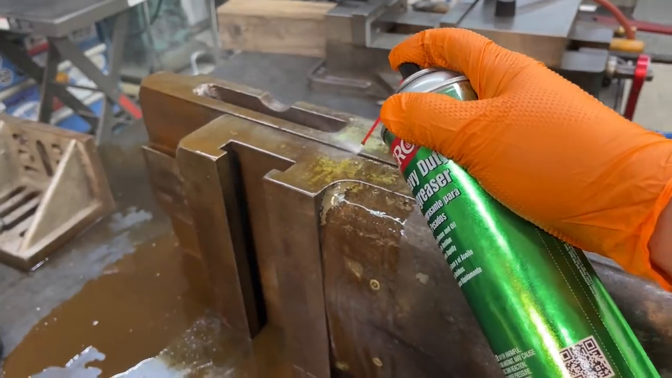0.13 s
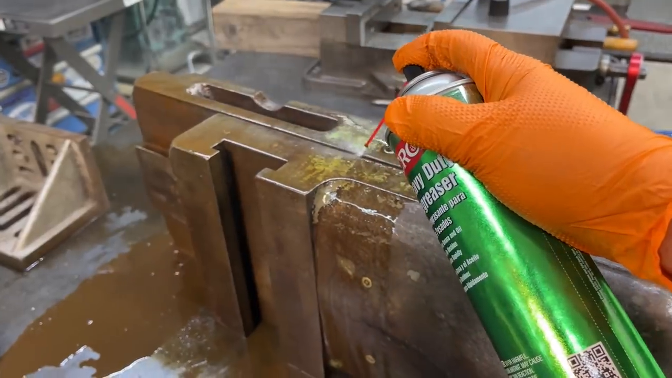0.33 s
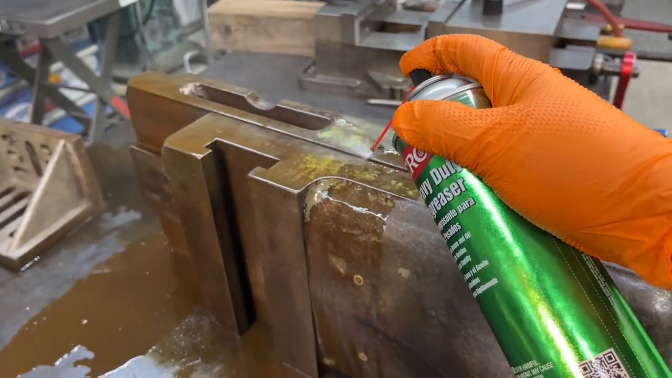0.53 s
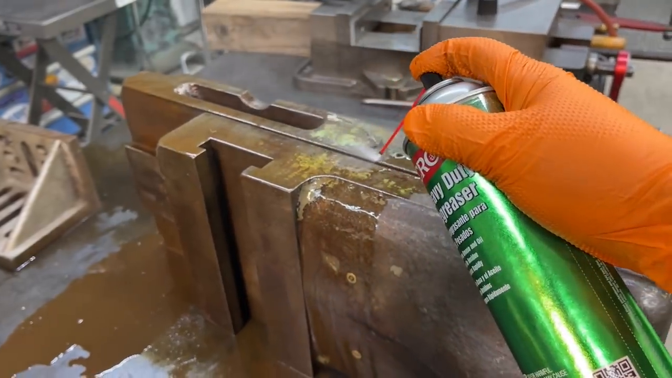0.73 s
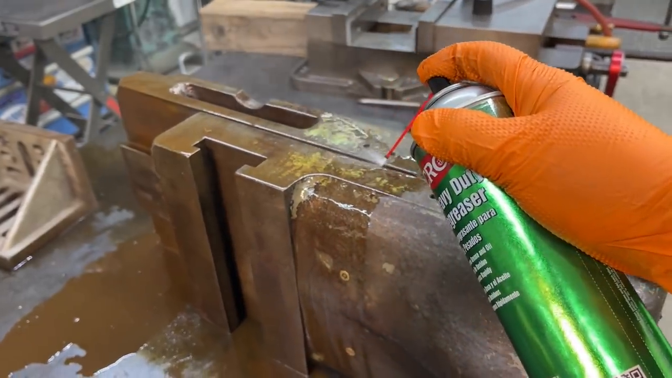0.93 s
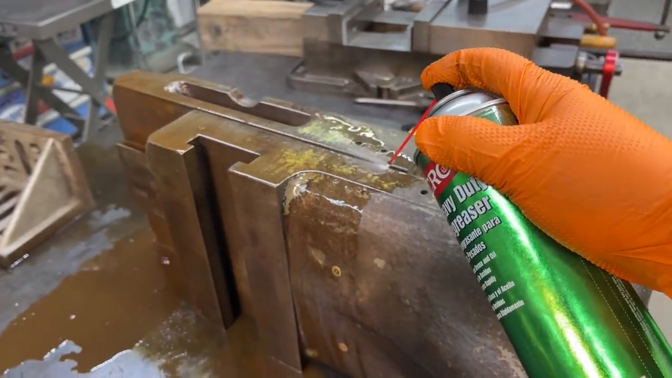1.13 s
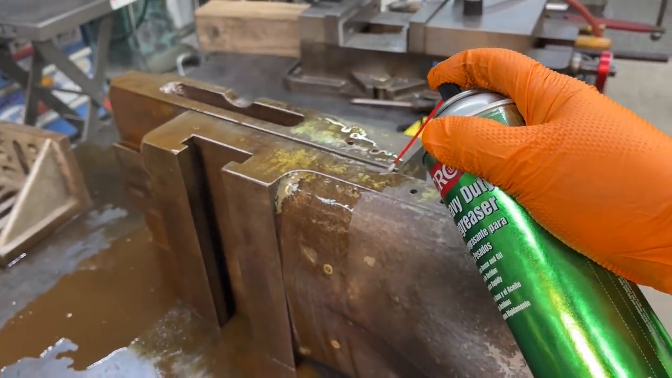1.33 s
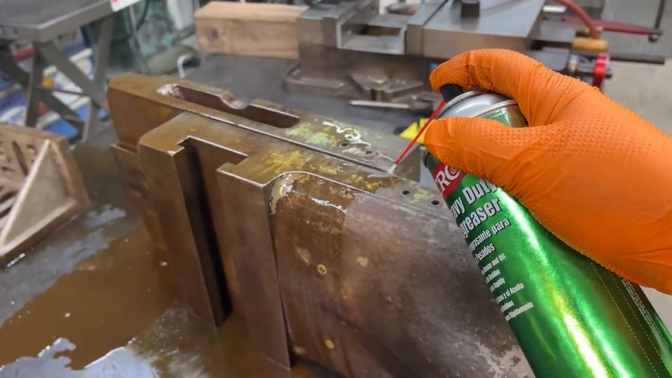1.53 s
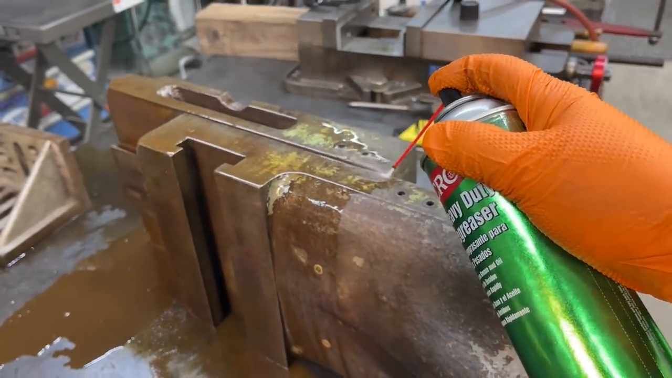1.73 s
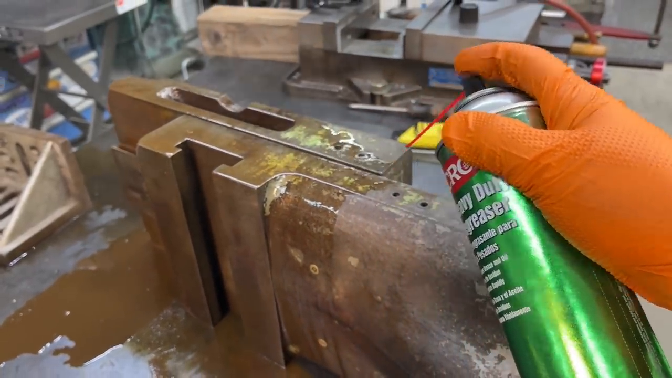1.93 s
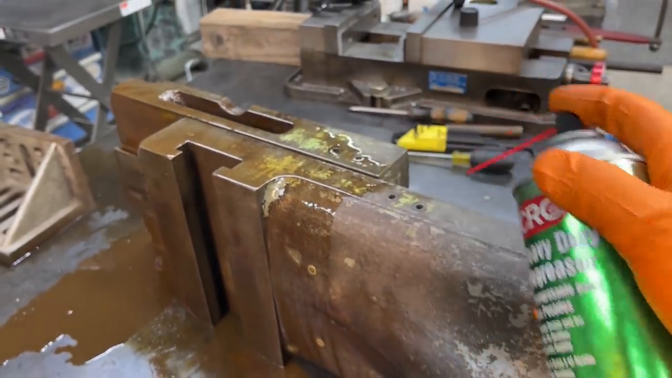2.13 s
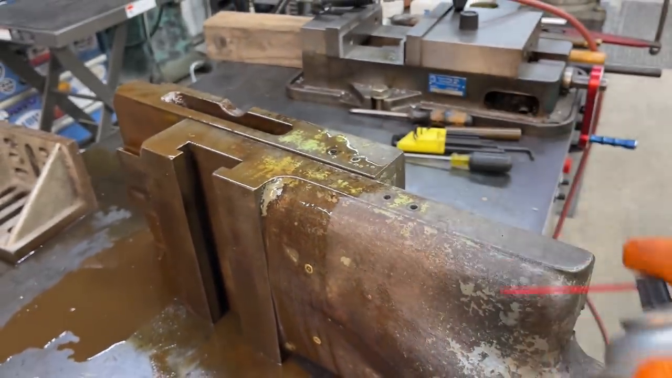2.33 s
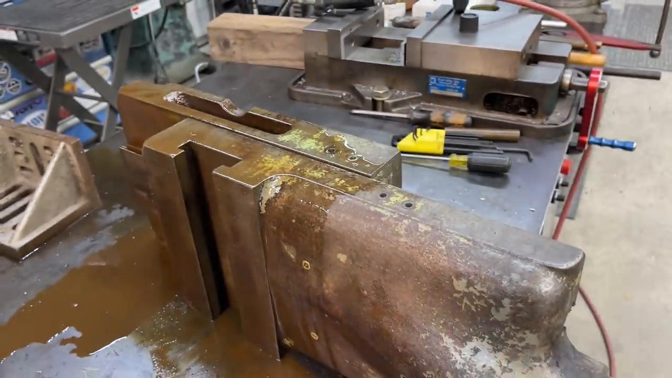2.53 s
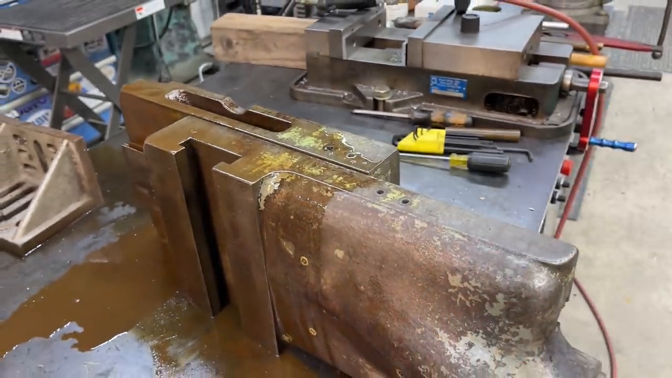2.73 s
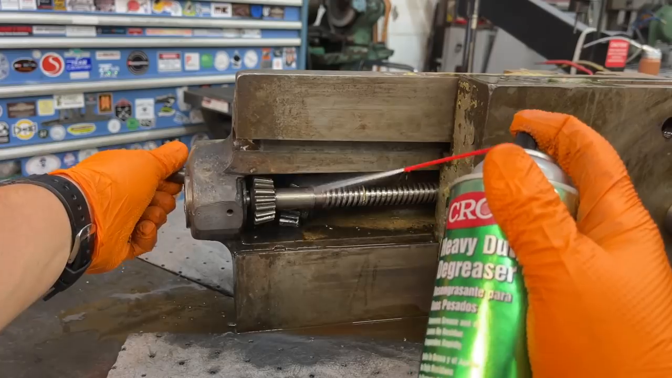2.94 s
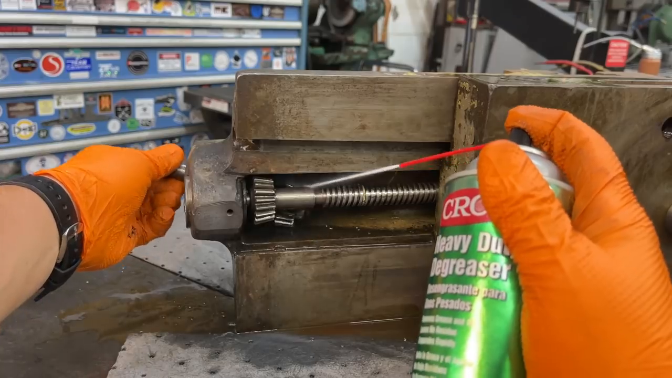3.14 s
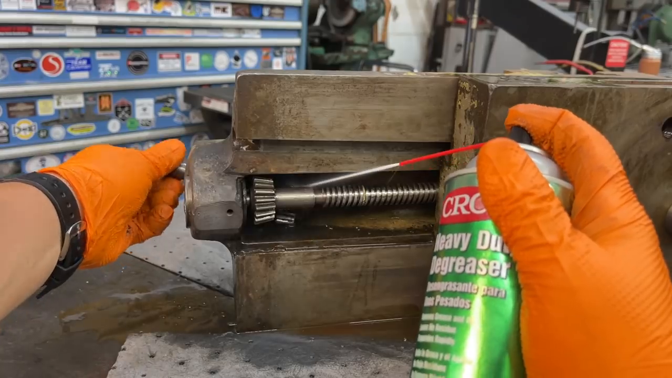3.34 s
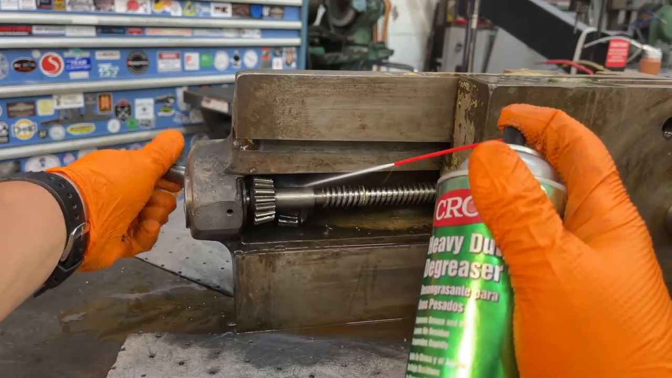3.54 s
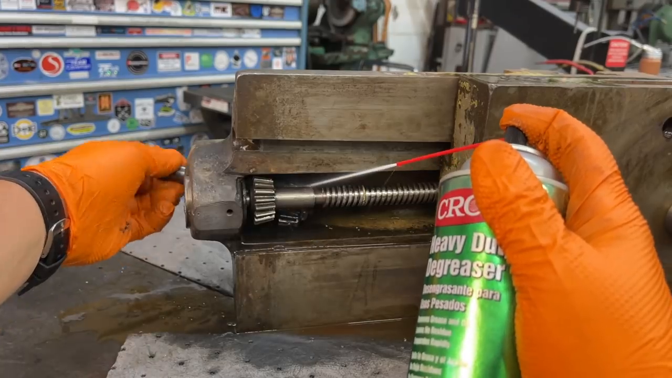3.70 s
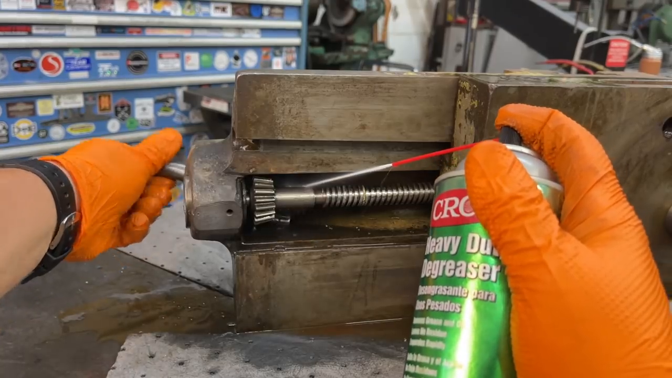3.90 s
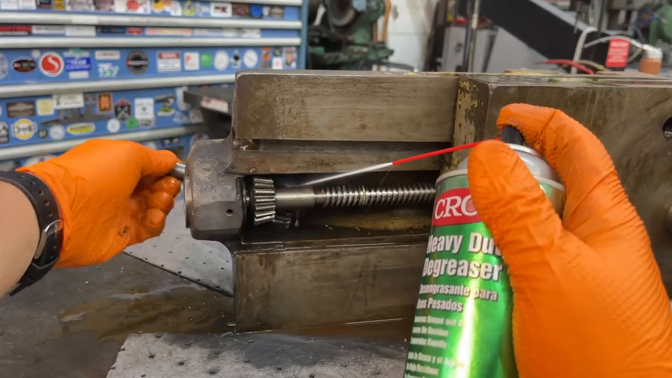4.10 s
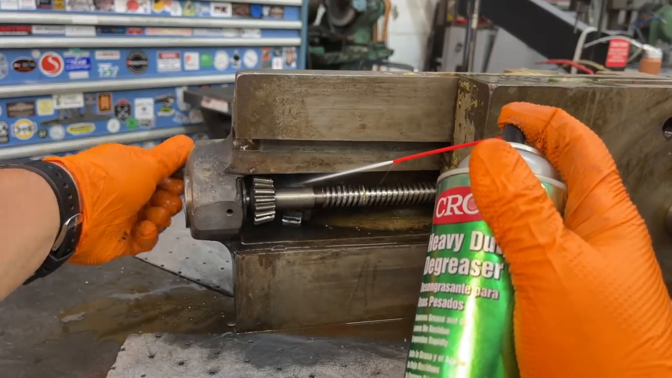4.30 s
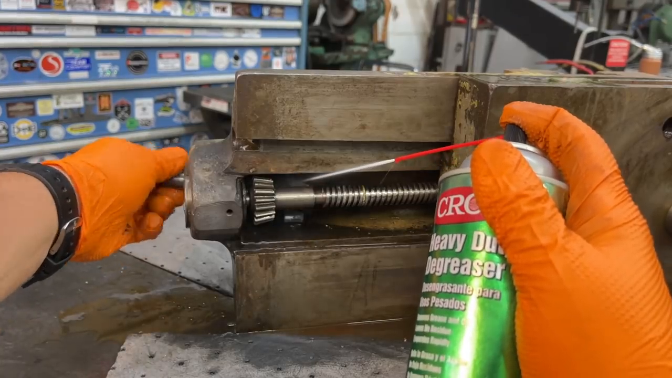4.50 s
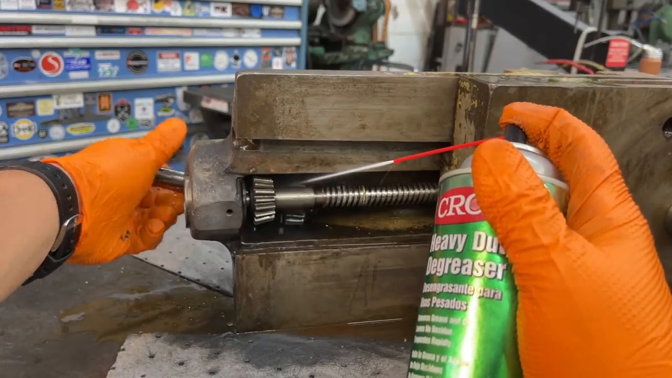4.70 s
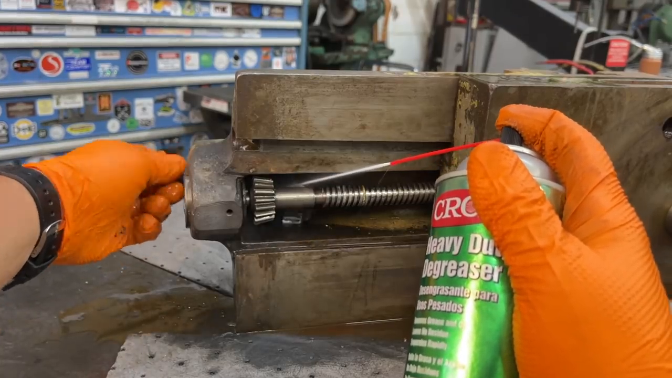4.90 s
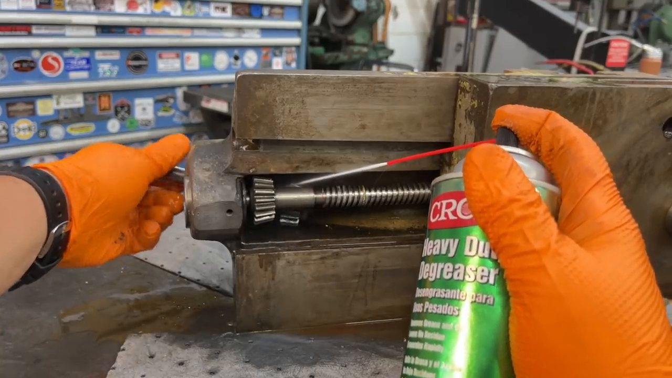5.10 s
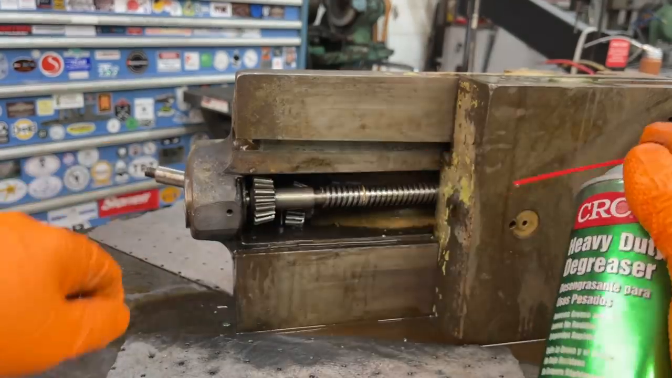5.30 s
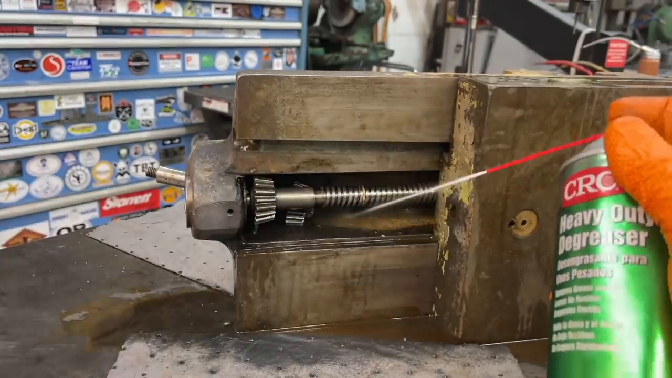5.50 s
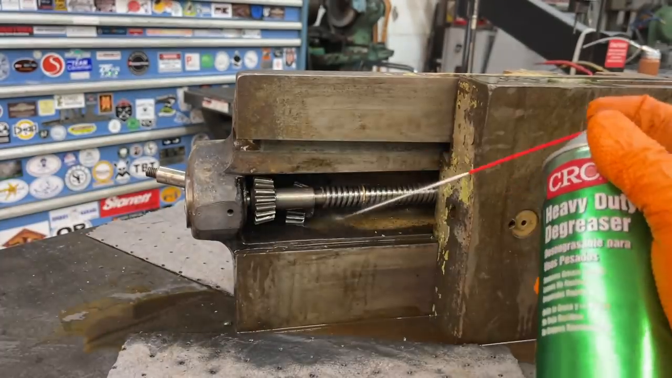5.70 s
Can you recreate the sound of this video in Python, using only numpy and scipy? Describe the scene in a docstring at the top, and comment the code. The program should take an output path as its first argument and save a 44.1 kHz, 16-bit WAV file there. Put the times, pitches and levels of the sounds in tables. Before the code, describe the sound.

An aerosol can hisses onto iron in a workshop, pauses, then sprays again while a hand crank rattles and knocks, ending on a third spray.

```python
"""In a workshop, over ventilation noise, an aerosol can is already spraying iron through a straw.
In the pause come soft bright noise swells, a faint rustle and ticks; dull bumps fall here and there, mostly
near the third spray. During the second spray a hand crank turns a screw: a low tone, a rumbling casting, a
loose handle's knocks and small pings. Valve clicks and a third spray follow. Hiss is shaped noise, spread in
stereo with phase and likeness between the channels varying with pitch; parts are ringing modes."""
import sys
import numpy as np
from scipy import signal
from scipy.fft import rfft, irfft
from scipy.io import wavfile
from scipy.ndimage import uniform_filter1d

SR = 44100
rng = np.random.default_rng(int(sys.argv[2]) if len(sys.argv) > 2 else 0)


def int16_out(signal):
    """Quantize to a 16-bit WAV file."""
    q = np.round(np.clip(np.atleast_2d(signal).T, -1, 1) * 32767)
    wavfile.write(sys.argv[1], SR, q.astype(np.int16))


N = 253575  # samples, 5.75 s


def gain_of(db):
    """dB to gain."""
    return 10 ** (np.asarray(db) / 20)


def evened(x):
    """Scales to rms 1."""
    return x / np.sqrt(np.mean(x ** 2) + 1e-20)


def read(rows, hz):
    """Columns of a spectrum table at hz, straight on a log axis."""
    f, *columns = np.transpose(rows)
    return [np.interp(np.log(hz + 1), np.log(f + 1), c)[:, None] for c in columns]


def follow(rows, t):
    """Columns of a curve at times t, and a gate that is open while the curve lasts."""
    s, *columns = np.transpose(rows)
    gate = np.clip(np.minimum(t - s[0], s[-1] - t) / .004 + .5, 0, 1)
    return gate, *[np.interp(t, s, c) for c in columns]


def add(mix, s, sound):
    """Mixes a stereo sound in at s seconds."""
    part = mix[:, round(s * SR):][:, :sound.shape[1]]
    part += sound[:, :part.shape[1]]


def pan(lean_db):
    """Splits a left-minus-right lean into dB at the two channels."""
    return np.array([[lean_db / 2], [-lean_db / 2]])


def noise(colour_db, same, lean_db=0, lead=0, patchy_db=1, flicker_db=1):
    """Random spectra (bins x frames) in two channels, with drifting patches and a flicker shared by both."""
    a, b, c, d, patches = rng.standard_normal((N // 128 + 5, 257, 5)).T
    flicker = evened(uniform_filter1d(patches, 60, 0))  # wide bands, new every frame
    patches = evened(uniform_filter1d(uniform_filter1d(patches, 6, 0), 25, 1))
    same = np.clip(same, 0, 1)
    left = a + 1j * b
    alone = c + 1j * d  # what only the right channel holds
    right = (same * left + np.sqrt(1 - same ** 2) * alone) * np.exp(1j * lead)
    z = np.array([left * gain_of(lean_db / 2), right * gain_of(-lean_db / 2)])
    z *= gain_of(colour_db + patchy_db * patches + flicker_db * flicker)
    return signal.istft(z, nperseg=512, noverlap=384)[1][:, :N]


def modes(x, table):
    """Noise rung twice through each fixed resonance, rms 1."""
    out = 0
    for hz, width, db in table:
        pole = np.exp((2j * hz - width) * np.pi / SR)
        rung = signal.lfilter([1], [1, -2 * pole, pole ** 2], x).real
        out = out + gain_of(db) * evened(rung)
    return evened(out)


# Colour of the ventilation in the workshop. Each row: frequency in Hz, relative density in dB per Hz.
SHOP_COLOUR = [(15, -37.5), (25, -17.5), (40, -4.5), (60, 1.5), (85, 2), (130, -10.5), (225, -19.5),
               (430, -19), (560, -36), (800, -31.5), (1300, -36), (2200, -38), (3400, -48), (8500, -47.5),
               (10000, -59), (13000, -94.5)]
# Its level at the microphone. Each row: time in seconds, level in dB.
SHOP_LEVEL = [(0, -53.5), (2.79, -55), (2.81, -47.5), (5.24, -50), (5.75, -49)]
# How alike the two channels are. Each row: frequency in Hz, likeness from 0 to 1.
SHOP_SAME = [(30, 0.96), (300, 0.72), (2000, 0), (9000, 0.37)]


def shop():
    """Ventilation rumble, built over one long spectrum to keep its bass shape."""
    hz = np.fft.rfftfreq(N, 1 / SR)
    a, b = rfft(rng.standard_normal((2, N)))
    same = np.clip(read(SHOP_SAME, hz)[0][:, 0], 0, 1)
    channels = np.array([a, same * a + np.sqrt(1 - same ** 2) * b])
    air = irfft(channels * gain_of(read(SHOP_COLOUR, hz)[0][:, 0]), N)
    level_db = follow(SHOP_LEVEL, np.arange(N) / SR)[1]
    return evened(air) * gain_of(level_db)


OPEN_S, OPEN_FROM_DB = .03, -17  # the valve opens: the jet climbs from this far down
SHUT_DB_PER_S, SHUT_S = -600, 0.089  # the valve shuts: the jet dies away


def jet_db(rows, t):
    """The pressed level, with the valve opening (unless already open) and shutting."""
    start, end = rows[0][0], rows[-1][0]
    opening = OPEN_FROM_DB * np.clip(1 - (t - start) / OPEN_S, 0, 1) * (start > 0)
    return follow(rows, t)[1] + opening + SHUT_DB_PER_S * np.maximum(t - end, 0)


# The three sprays, one table each. Each row: time in seconds, jet level in dB before the room,
# swell of the splash near 900 Hz in dB.
SPRAYS = [
    [(0.0, -38, -1), (0.375, -35.5, -4), (0.395, -34, 3.5), (0.6, -32.5, 0.5), (0.88, -33, 3.5),
     (1.1, -30, -3), (1.3, -32.5, -0.5), (1.6, -35.5, 4.5), (1.71, -35, 5), (1.82, -36, 2)],
    [(2.86, -27.5, -7), (2.91, -32, 5.5), (3.02, -31, 6), (3.2, -32.5, 4), (3.66, -30, 0), (3.84, -31, -2),
     (4.26, -29, 3), (4.54, -30.5, 4.5), (4.96, -29.5, 2), (5.088, -28.5, 2)],
    [(5.277, -27.5, -4), (5.305, -28.5, 0), (5.33, -30.5, -1.5), (5.47, -31, -1.5), (5.7, -31.5, -2.5),
     (5.76, -30.5, 0)],
]
# Colour of each spray at the place where it lands: on a rail, in a slot, on the screw.
# Each row: frequency in Hz, relative density in dB per Hz.
JET_ON_RAIL = [(300, -24.5), (550, -22), (900, -9.5), (1400, -13), (1900, -10.5), (2600, -13), (3400, -10),
               (3900, -3), (5000, -6.5), (5500, -8), (6300, -2), (6800, -5.5), (8600, 1.5), (9400, 2),
               (11000, -9.5), (13000, -17), (14300, -34.5), (15300, -19.5)]
JET_IN_SLOT = [(300, -16), (700, -13), (1000, -15.5), (1400, -13), (2200, -15.5), (3000, -10),
               (4000, -13.5), (5400, -7), (6100, -11.5), (7500, -5.5), (8500, -2), (9400, 2.9),
               (10600, -11.5), (11200, -4.5), (13000, -19), (14300, -22.5), (15300, -20)]
JET_ON_SCREW = [(300, -23), (550, -13), (950, -11), (1300, -18.5), (2200, -14.5), (3600, -13), (4300, -9.5),
                (5700, -10.5), (6300, -8.5), (7000, -10), (8500, 2), (9400, -5), (10300, -4.5),
                (12000, -10.5), (13200, -17), (14700, -31), (15400, -18)]
# Stereo spread of the hiss from each place. Each row: frequency in Hz, likeness of the channels from 0 to 1,
# left minus right in dB, phase lead of the right channel in radians.
STEREO_RAIL = [(300, 0.78, -1.0, 0.06), (1000, 0.93, 0.1, 0.53), (1600, 0.74, 0.7, 0.17),
               (2200, 0.51, 1.1, 2.07), (2700, 0.76, -0.7, 3.04), (3300, 0.46, -1.1, 4.91),
               (3900, 0.98, 0.2, 6.33), (4600, 0.76, 0.7, 7.49), (5400, 0.27, -8.1, 8.53),
               (6300, 0.91, -2.1, 6.52), (7100, 0.78, -2.9, 6.69), (8600, 1, 0, 6.3)]
STEREO_SLOT = [(300, 0.88, 3.0, -0.02), (1000, 0.87, 3.8, -0.68), (1600, 0.81, 0.5, -0.11),
               (2200, 0.65, 0.9, -0.17), (2700, 0.62, 5.0, -1.54), (3300, 0.5, 6.4, -1.26),
               (3900, 0.65, 3.3, -0.28), (4600, 0.7, 4.3, -0.51), (5400, 0.63, 8.2, -1.16),
               (6300, 0.72, 2.4, -0.11), (7100, 0.41, 8.3, -0.47), (8600, 1, 0, 0)]
STEREO_SCREW = [(300, 0.91, 1.6, 0.07), (1000, 0.87, 3.9, -0.47), (1600, 0.79, 1.1, 0.04),
                (2200, 0.93, 0.7, -0.1), (3300, 0.63, 1.2, -0.82), (3900, 0.75, 1.4, -0.35),
                (5400, 0.51, 2.1, -1.04), (6300, 0.93, 0.5, -0.06), (7100, 0.57, 4.0, -0.77),
                (8600, 1, 0, 0)]
FROTH_PER_DB, FROTH_MOST_DB = -.7, 8  # froth near 4 kHz stands out more as the jet weakens
FRESH_DB, FRESH_S = 2.5, 0.084  # the froth is thicker just after the valve opens
FLARE_DB, FLARE_S = 5, 0.017  # the froth spits brighter just before the valve shuts
# a chosen stereo rule for the treble hiss: the phase between the channels turns steadily with pitch
# and their likeness dips
TURN_FROM_HZ, HALF_TURN_HZ, DIP = 8600, 1700, .5
RAIL_TURN, SLOT_TURN = -1, 1  # direction of that turn


def spray(rows, jet, stereo, turning):
    """Turbulent hiss; the splash and froth bands swell as the jet meets wet iron."""
    hz = np.fft.rfftfreq(512, 1 / SR)
    column = hz[:, None]
    t = np.arange(N // 128 + 5) * 128 / SR
    start, end = rows[0][0], rows[-1][0]
    splash_db = follow(rows, t)[2]
    usual_db = np.median(rows, axis=0)[1]
    froth_db = np.minimum(FROTH_PER_DB * (jet_db(rows, t) - usual_db), FROTH_MOST_DB)
    froth_db = froth_db + FRESH_DB * np.exp(-abs(t - start) / FRESH_S) * (start > 0)
    froth_db = froth_db + FLARE_DB * np.exp(-((t - end) / FLARE_S + 1) ** 2)
    splash = np.exp(-np.log((column + 1) / 900) ** 2 / .5)
    froth = np.exp(-np.log((column + 1) / 4300) ** 2 / 0.24)
    colour_db = read(jet, hz)[0] - 30 * (column < 150) + splash_db * splash + froth_db * froth
    same, lean_db, lead = read(stereo, hz)
    turn = turning * np.pi * np.maximum(column - TURN_FROM_HZ, 0) / HALF_TURN_HZ
    dip = DIP * np.sin(turn) ** 2 * np.minimum(abs(turn) / (2 * np.pi), 1)
    hiss = noise(colour_db, same - dip, lean_db, lead + turn, patchy_db=1.76, flicker_db=0.95)
    t = np.arange(N) / SR
    on = (t > start) & (t < end + SHUT_S)
    return on * hiss * gain_of(jet_db(rows, t)) / np.std(hiss[:, on])


# How long the workshop rings. Each row: frequency in Hz, t60 in seconds.
ROOM = [(300, 0.29), (1300, 0.77), (3500, 0.4), (9000, 0.33), (12000, 0.087)]


def room(x):
    """Sparse taps of random sign, each band dying at its own speed."""
    taps = np.zeros((2, SR))
    at = np.arange(300, SR - 20, 20) + rng.integers(0, 20, (2, (SR - 301) // 20))
    np.put_along_axis(taps, at, rng.choice([-1., 1.], at.shape), 1)
    hz, t, z = signal.stft(taps, SR, nperseg=256)
    tail = signal.istft(z * gain_of(-60 * t / read(ROOM, hz)[0]), SR, nperseg=256)[1]
    return signal.fftconvolve(x, tail / np.linalg.norm(tail[0]), axes=1)[:, :N]


# Dull bumps of the can and the hands. Each row: start in seconds, starting level in dB,
# frequency in Hz, t60 in seconds, left minus right in dB.
BUMPS = [(1.575, -53, 140, .05, 17), (2.739, -55, 500, .02, 11), (5.225, -37.5, 312, 0.027, 6),
         (5.443, -35, 225, 0.018, 2), (5.541, -36.5, 270, 0.035, 5)]


def bumps():
    """Each bump is one low sine dying away."""
    t, out = np.arange(3000) / SR, np.zeros((2, N))
    for s, db, hz, t60, lean_db in BUMPS:
        add(out, s, np.sin(2 * np.pi * hz * t) * gain_of(db - 60 * t / t60 + pan(lean_db)))
    return out


def soft_bed(level, colour):
    """Coloured, flickering noise, half alike in the two channels, under a level curve."""
    colour_db = read(colour, np.fft.rfftfreq(512, 1 / SR))[0]
    return level * evened(noise(colour_db, .5, patchy_db=1.2, flicker_db=2.5))


# Soft bright noise swells. Each row: start in seconds, starting level in dB, t60 in seconds.
SWELLS = [(1.87, -53.5, 0.57), (2.416, -62.5, 0.46), (2.62, -73, .1), (2.802, -69, 0.32)]
# Colour of the swells. Each row: frequency in Hz, relative density in dB per Hz.
SWELL_COLOUR = [(880, -37.5), (1500, -6), (2720, -2.5), (7770, -0.5), (9480, -2), (10400, -37),
                (11500, -24), (13000, -56)]


def swells():
    """Soft bright noise swells that start at once and die away."""
    t = np.arange(N) / SR
    level = sum((t > s) * gain_of(db - 60 * abs(t - s) / t60) for s, db, t60 in SWELLS)
    return soft_bed(level, SWELL_COLOUR)


# A soft rustle in the pause. Each row: time in seconds, level in dB.
RUSTLE = [(1.95, -72), (2.1, -79.5), (2.22, -80), (2.28, -70.5), (2.4, -74.5), (2.51, -71), (2.6, -73.5),
          (2.7, -71.5), (2.79, -83), (2.805, -62), (2.86, -64)]
# Colour of the rustle. Each row: frequency in Hz, relative density in dB per Hz.
RUSTLE_COLOUR = [(300, -16), (500, -8), (800, -10), (1200, -8), (1700, -15), (2200, -17), (3500, -26),
                 (5000, -38)]


def rustle():
    """Dull soft noise following a level curve."""
    gate, level_db = follow(RUSTLE, np.arange(N) / SR)
    return soft_bed(gate * gain_of(level_db), RUSTLE_COLOUR)


# Foam and drips ticking, then valve clicks. Each row: start in seconds, level in dB before the decay,
# centre frequency in Hz.
TICKS = [(2.3311, -75, 2040), (2.4156, -44.5, 6100), (2.4404, -48, 7900), (2.4464, -59, 8000),
         (2.4793, -72, 7210), (2.5073, -65, 2270), (2.5164, -66, 7160), (2.592, -69, 2820),
         (2.624, -71, 2100), (2.736, -62, 2010), (5.2687, -31.5, 4036), (5.2926, -31, 3300)]
TICK_RISE_S, TICK_T60_S, TICK_WIDTH_HZ = .002, 0.023, 2100  # width of one filter pass


def ticks():
    """Tiny bursts of band noise, the same in both channels."""
    t, out = np.arange(3000) / SR, np.zeros((2, N))
    for s, db, hz in TICKS:
        burst = modes(rng.standard_normal(len(t)), [(hz, TICK_WIDTH_HZ, 0)])
        burst = burst * np.minimum(t / TICK_RISE_S, 1)
        add(out, s, np.array([burst, burst]) * gain_of(db - 60 * t / TICK_T60_S))
    return out


# A low steady tone beside the crank. Each row: time in seconds, level in dB before the lean to the left.
HUM = [(2.8, -55), (2.824, -46.5), (3.104, -48), (3.17, -62), (3.206, -40), (3.326, -68), (3.512, -42),
       (3.576, -50), (3.72, -50)]
HUM_HZ = 211


def hum():
    """One sine whose level follows a curve, stronger on the left."""
    t = np.arange(N) / SR
    gate, level_db = follow(HUM, t)
    tone = gate * gain_of(level_db) * np.sqrt(2) * np.sin(2 * np.pi * HUM_HZ * t)
    return tone * gain_of([[2.5], [-3.5]])


# Pushes of the hand on the crank. Each row: start in seconds, length in seconds,
# casting rumble in dB, bench rumble in dB, both before the sag and the lean to the left.
PUSHES = [(2.929, .14, -36.5, -40.5), (3.185, 0.035, -38, -50), (3.274, 0.16, -34, -42.5),
          (3.464, 0.01, -49, -48), (3.708, 0.073, -31.5, -43.5), (3.802, 0.051, -30, -36.5),
          (3.964, 0.028, -38.5, -63), (4.087, 0.25, -34.5, -42), (4.528, 0.043, -33, -44),
          (4.62, 0.033, -50, -49.5), (4.862, 0.08, -31.5, -39.5), (4.965, .1, -36.5, -41.5)]
# Resonances of the casting, the bench and the screw thread.
# Each row: frequency in Hz, width of one filter pass in Hz, relative level in dB.
CASTING = [(270.4, 17, -9.5), (292.9, 36, -0.5), (316, 39, -5.5), (346.5, 49, -16), (464, 99, -12.5)]
BENCH = [(76.6, 5.7, -18), (103.2, 13.2, 5.5), (122.6, 11, 5.5), (145.4, 40, 1), (174.3, 30, 9)]
THREAD = [(972, 19, 7), (1044, 18.5, 13.5), (1102, 13, 3.5), (1370, 64, 4)]
PUSH_RISE_S, PUSH_SAG_DB_PER_S, PUSH_FALL_DB_PER_S = 0.029, -11.5, -250
TURN_START_S, TURN_END_S, EASE_S = 2.86, 5.14, 0.064  # the screw keeps creeping between pushes
IDLE_CASTING_DB, IDLE_BENCH_DB, IDLE_THREAD_DB = -55, -50.5, -49.5
THREAD_UNDER_CASTING_DB = -15


def rumble():
    """Uneven slips of the thread shake the casting, the bench and the screw."""
    t = np.arange(N) / SR
    unevenness_db = 2.47 * evened(uniform_filter1d(rng.standard_normal(N), 500))
    slips = rng.standard_normal((3, 3, N)) * gain_of(unevenness_db)
    start, length, casting_db, bench_db = np.transpose(PUSHES)[..., None]
    push = np.clip((t - start) / PUSH_RISE_S, 0, 1)
    push *= gain_of(PUSH_FALL_DB_PER_S * np.maximum(t - start - length, 0))
    push *= gain_of(PUSH_SAG_DB_PER_S * np.maximum(t - start, 0))
    casting = (push * gain_of(casting_db)).sum(0)
    bench = (push * gain_of(bench_db)).sum(0)
    creep = np.clip(np.minimum(t - TURN_START_S, TURN_END_S - t) / EASE_S, 0, 1)
    levels = (casting + creep * gain_of(IDLE_CASTING_DB),
              bench + creep * gain_of(IDLE_BENCH_DB),
              casting * gain_of(THREAD_UNDER_CASTING_DB) + creep * gain_of(IDLE_THREAD_DB))
    out = 0
    for level, x, table, apart in zip(levels, slips, (CASTING, BENCH, THREAD), (.1, .2, .9)):
        out = out + level * modes(x[0] + apart * x[1:], table)  # apart: what each channel holds alone
    return out * gain_of(pan(2.4))


KNOCK_LEAN_DB = 2.5  # left minus right


def ring(t, hz, db, t60, lead):
    """One dying mode in both channels."""
    wave = np.sin(2 * np.pi * hz * t + np.array([[0], [lead]]) + 2 * np.pi * rng.random())
    wave = wave * np.minimum(t / .0015, 1)
    return wave * gain_of(db - 60 * t / t60 + pan(KNOCK_LEAN_DB))


# What a blow rings in the gear, the housing, the loose handle and the screw. Each row: frequency in Hz,
# level against the blow in dB, t60 in seconds, phase lead of the right channel in radians.
GEAR = [(1725, -3, .05, .1), (1778, 1, .08, .1)]
HOUSING = [(370, 0.5, 0.04, 0.024), (460, -3, 0.015, 0.05), (587, 6, 0.046, 0.085), (755, 2.5, 0.028, -.2)]
HANDLE = [(513, 3, 0.15, -0.28), (946, -4, 0.17, -0.69)]
SCREW = [(1055, -1, .35, -1.1), (1102, -4, .3, -1.1)]
CRACK_T60_S, RATTLE_DB, RATTLE_T60_S = 0.02, -9, 0.17
GEAR_CRACK_DB, SCREW_CRACK_DB = -0.5, -5  # the crack against each blow


def knock(gear_db, housing_db, handle_db, screw_db):
    """A short rattling crack, then each part rings as hard as it was struck."""
    t = np.arange(SR // 3) / SR
    # bands: Hz, width of one filter pass in Hz, dB
    crack = modes(rng.standard_normal((2, len(t))), [(650, 880, 2.5), (1760, 1800, 5), (3260, 2700, 2.5)])
    shape = gain_of(-60 * t / CRACK_T60_S) + gain_of(RATTLE_DB - 60 * t / RATTLE_T60_S)
    shape = shape * np.minimum(t / .001, 1)
    size = gain_of(gear_db + GEAR_CRACK_DB) + gain_of(screw_db + SCREW_CRACK_DB)
    # mostly shared by the channels
    out = size * shape * (crack[0] + 0.27 * crack) * gain_of(pan(KNOCK_LEAN_DB))
    for part, blow_db in (GEAR, gear_db), (HOUSING, housing_db), (HANDLE, handle_db), (SCREW, screw_db):
        for hz, db, t60, lead in part:
            out += ring(t, hz, blow_db + db, t60, lead)
    return out


# Knocks of the crank. Each row: start in seconds, then the strength in dB of the blow on the gear,
# the housing, the handle and the screw.
KNOCKS = [(2.899, -46, -56, -53, -53), (2.943, -31.5, -31.5, -33, -48), (2.985, -27.5, -26.5, -46, -32),
          (3.004, -27, -28, -30.5, -37), (3.058, -44, -34, -35.5, -58), (3.095, -41, -42, -56, -37.5),
          (3.197, -35.5, -39.5, -36, -41), (3.32, -50, -34, -37, -50), (3.351, -30, -30.5, -35, -52),
          (3.487, -50, -49, -34, -51), (3.807, -49, -34.5, -39, -32.5), (3.975, -54, -46, -32, -47),
          (4.152, -41, -40, -39, -45), (4.181, -31.5, -27, -36, -37), (4.279, -46.5, -45, -42, -60),
          (4.3, -56, -36.5, -33.5, -35.5), (4.421, -40, -59, -33, -58), (4.504, -29, -28.5, -51, -38),
          (4.556, -29.5, -29.5, -39, -35.5), (4.599, -35, -37, -36.5, -24), (5.043, -31, -37, -33, -57)]


def knocks():
    """Blows on the crank's parts, one after another."""
    out = np.zeros((2, N))
    for s, *blows_db in KNOCKS:
        add(out, s, knock(*blows_db))
    return out


# Small loose parts. Each row: start in seconds, level in dB before lean and decay,
# frequency in Hz, t60 in seconds.
PINGS = [(2.986, -31, 3010, .06), (3.807, -26, 3070, .07), (4.2, -33, 2150, .05), (4.599, -27, 2455, .15)]
PING_LEAD = -.8  # phase lead of the right channel, radians


def pings():
    """Each loose part pings in one dying mode."""
    t, out = np.arange(SR // 5) / SR, np.zeros((2, N))
    for s, db, hz, t60 in PINGS:
        add(out, s, ring(t, hz, db, t60, PING_LEAD))
    return out


HUSH_S = 5.243  # the first two sprays, the crank and all their ringing are silent from here
WET_DB = -16  # room against direct sound


def scene():
    """Sprays and crank ring in the room over small noises and ventilation."""
    first, second, third = SPRAYS
    early = spray(first, JET_ON_RAIL, STEREO_RAIL, RAIL_TURN)
    early = early + spray(second, JET_IN_SLOT, STEREO_SLOT, SLOT_TURN)
    early = early + hum() + rumble() + knocks() + pings()
    late = spray(third, JET_ON_SCREW, STEREO_SCREW, SLOT_TURN)
    hush = np.clip((HUSH_S - np.arange(N) / SR) / 0.0033, 0, 1)
    wet = gain_of(WET_DB)
    sprayed = (early + wet * room(early)) * hush + late + wet * room(late)
    return sprayed + bumps() + swells() + rustle() + ticks() + shop()


EDGE_HZ = 15750


def record(dry):
    """The band limits of the microphone chain: a gentle bass cut and a steep treble edge."""
    thin = signal.sosfilt(signal.butter(2, 30, "high", fs=SR, output="sos"), dry)
    edge = signal.firwin(511, EDGE_HZ, window=("kaiser", 9), fs=SR)
    return signal.oaconvolve(thin, edge[None], "same")


dry = scene()
out = record(dry)
int16_out(out)
```